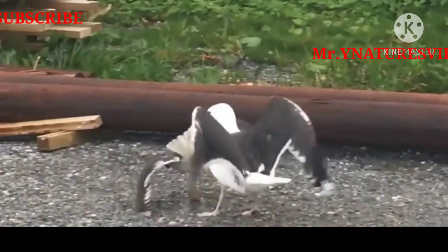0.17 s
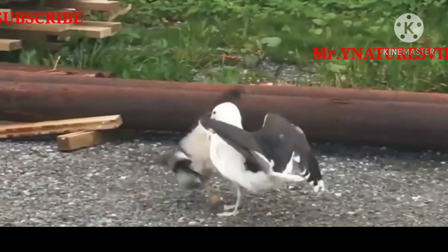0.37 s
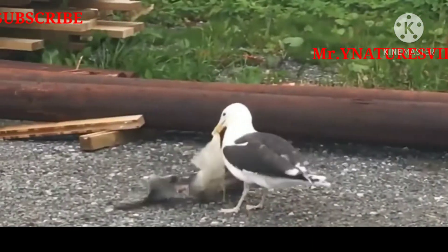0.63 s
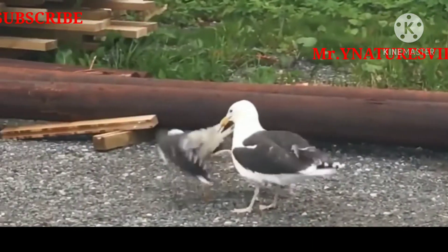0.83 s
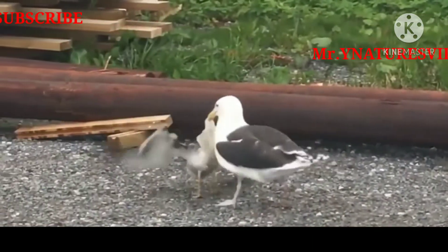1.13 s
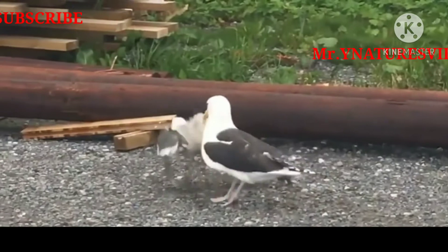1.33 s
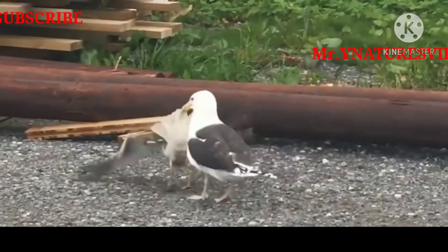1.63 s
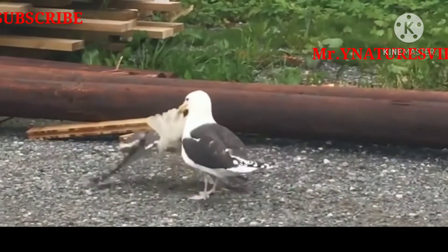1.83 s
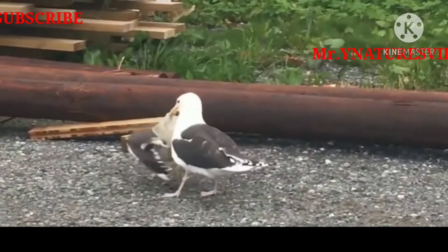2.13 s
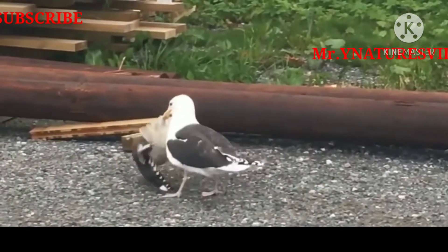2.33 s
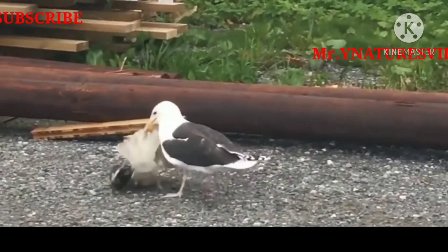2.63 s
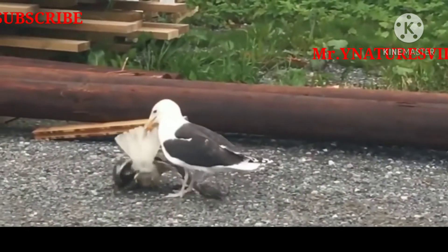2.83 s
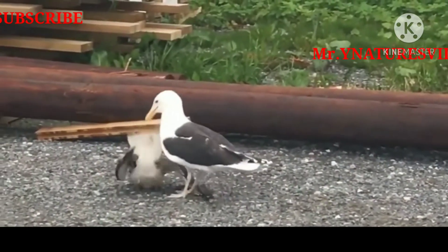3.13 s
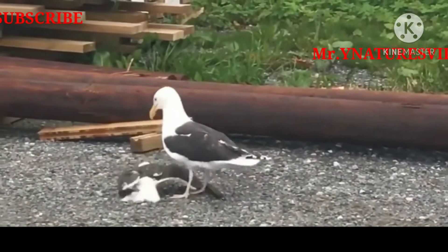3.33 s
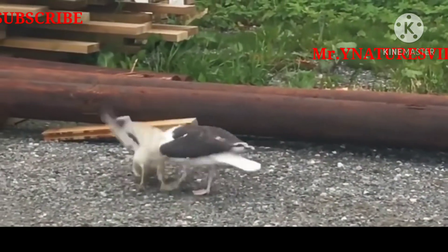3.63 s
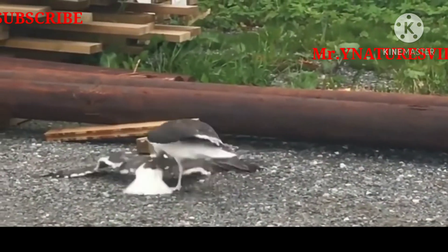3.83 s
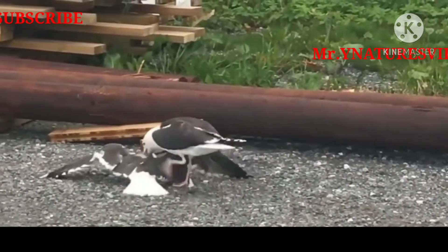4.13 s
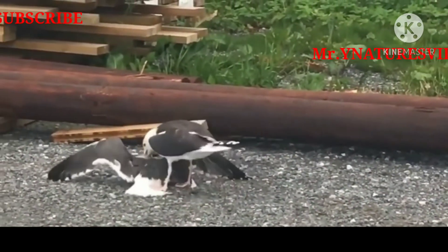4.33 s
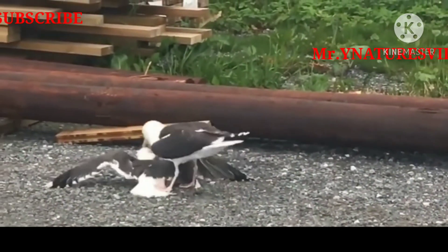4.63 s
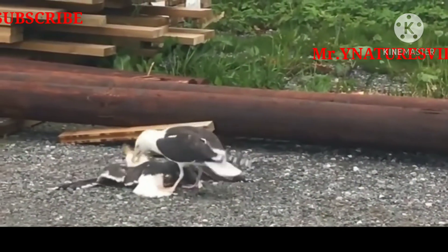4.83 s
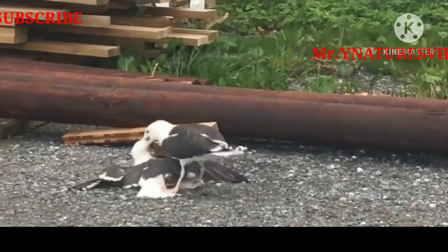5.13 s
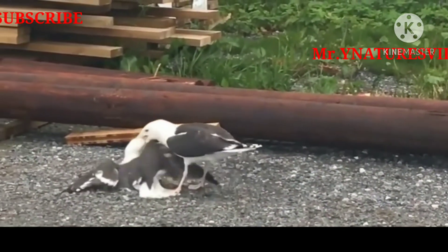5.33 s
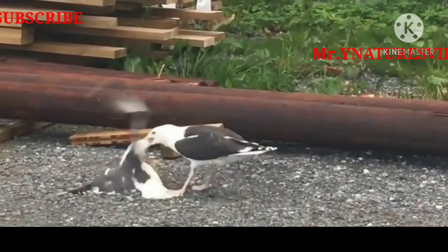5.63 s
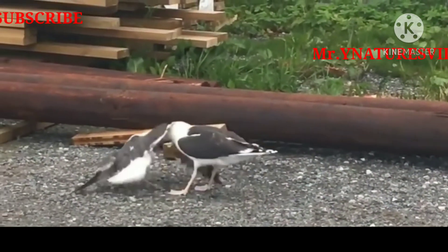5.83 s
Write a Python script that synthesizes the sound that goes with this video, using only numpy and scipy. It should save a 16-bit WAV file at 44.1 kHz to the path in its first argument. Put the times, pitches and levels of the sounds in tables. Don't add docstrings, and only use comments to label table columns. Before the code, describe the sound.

A gripped gull gives harsh, wavering, nasal cries over scuffing gravel and wing flutter, then small clicks and a thin whine, with low wind rumble.

```python
import sys
import numpy as np
from scipy import signal
from scipy.fft import rfft, irfft, next_fast_len
from scipy.io import wavfile
from scipy.ndimage import uniform_filter1d, map_coordinates

SR = 44100
rng = np.random.default_rng(int(sys.argv[2]) if len(sys.argv) > 2 else 0)


def volts_from_decibels(level):
    exponent = np.asarray(level, float) / 20
    return 10 ** exponent


def waveform_to_disk(signal):
    frames = np.transpose(np.atleast_2d(signal))
    scaled = np.clip(frames, -1, 1) * 32767
    samples = np.round(scaled).astype(np.int16)
    wavfile.write(sys.argv[1], SR, samples)


N = 263718
TIME = np.arange(N) / SR
# start in seconds, length in seconds, pitch in Hz, effort in dB.
CHUCKS = [
    (3.782, .014, 218, -51),
    (3.799, 0.027, 236.7, -41.5),
    (3.838, 0.027, 240, -43.5),
    (3.886, .016, 284, -56),
]


def unit(x):
    return x / np.sqrt(np.mean(x ** 2) + 1e-20)


def along(points, hz):
    f, v = np.transpose(points)
    return np.interp(np.log(hz + 1), np.log(f + 1), v)


def curves(rows, t=TIME):
    s, *columns = np.transpose(rows)
    return [np.interp(t, s, column) for column in columns]


def wobble(rate, t=TIME):
    return map_coordinates(rng.standard_normal(N // 100), [(t - t[0]) * rate])


def filtered(x, response):
    m = next_fast_len(len(x) + 8192)
    return irfft(rfft(x, m) * response(np.fft.rfftfreq(m, 1 / SR)), m)[:len(x)]


def resonance(hz, width_hz, order=2):
    return lambda f: (1j * f * width_hz / (hz * hz - f * f + 1j * f * width_hz)) ** order


def noise(spectrum):
    return unit(filtered(rng.standard_normal(N), lambda hz: volts_from_decibels(along(spectrum, hz))))


def outdoors():
    # frequency in Hz, level in dB per Hz.
    rumble = [(13, -35), (22, -10), (38, 3), (55, -0.5), (135, -6), (193, -19.5), (216, -41.5), (320, -23),
              (420, -82), (700, -120)]
    # frequency in Hz, level in dB per Hz.
    air = [(120, -14), (200, -2), (232, -8.5), (558, -16), (898, -21), (966, -2.5), (1060, -19.5),
           (2370, -28), (2690, -31.5), (3420, -15), (4840, -39), (6370, -19), (10600, -34), (14000, -23),
           (15900, -56)]
    # pitch in Hz, width in Hz, level in dB.
    hums = [
        (947, 6.3, -84.5),
        (187.4, 5.5, -76),
        (123.6, 16, -69),
        (48.8, 11.3, -59),
    ]
    # time in seconds, peak level in dB, pitch in Hz.
    buffets = [(.35, -48, 60), (.58, -49, 60), (.675, -42.5, 140), (1.36, -45, 140), (1.825, -39, 84),
               (1.99, -44, 70), (2.06, -48, 70), (2.25, -51, 60), (3.84, -46.5, 65), (5.67, -45.5, 50),
               (5.745, -38.5, 65), (5.81, -48, 50), (5.95, -52, 50)]
    breeze_db, buffet_cycles, air_db = -62.5, 1.2, -75

    wind = volts_from_decibels(breeze_db) * unit(volts_from_decibels(2.85 * wobble(21) + 0.7 * wobble(4)) * noise(rumble))
    for s, db, hz in buffets:
        since = TIME - s
        wind += volts_from_decibels(db) * np.exp(-(since * hz / buffet_cycles) ** 2) * np.sin(2 * np.pi * hz * since)
    machines = np.zeros(N)
    for hz, width_hz, db in hums:
        machines += volts_from_decibels(db) * unit(filtered(rng.standard_normal(N), resonance(hz, width_hz, order=1)))
    return wind + machines + volts_from_decibels(air_db - 3.5 + 0.27 * wobble(3.03)) * noise(air)


def gravel():
    # frequency in Hz, level in dB per Hz.
    stone_colour = [(150, -30), (250, 4), (319, -8.5), (606, -2), (1870, -6), (2740, -14.5), (3320, -12.5),
                    (10400, -21), (13300, -25), (15800, -25.5)]
    # time of the peak in seconds, feather rustle in dB,
    # seconds to rise 10 dB, seconds to fall 10 dB, gravel in dB against the rustle.
    scuffles = [(.085, -72, .025, .06, -6), (.145, -78, .02, .02, -6), (.3, -74.5, .025, .025, -9),
                (.385, -74.5, .025, .02, -10), (.35, -83, .4, 0.1, 0), (.49, -70, .035, 0.04, -11),
                (.6, -77, .06, .05, -2), (.69, -70, 0.04, 0.04, 1.5), (.8, -69, .015, .08, -2.5),
                (.83, -68.5, .04, .06, -2.5), (.905, -68.5, .05, .06, -3), (.96, -71.5, .04, .03, -4),
                (1.03, -77, .1, .1, -8), (1.36, -66, 0.015, 0.05, -2), (1.405, -65.5, .05, .09, -6),
                (1.48, -71, .05, .04, -10), (1.66, -71, .02, .04, -12), (1.75, -76, .15, 0.08, -12),
                (1.82, -73, .02, .03, -10), (1.895, -70, 0.025, 0.04, -6), (1.96, -71, .025, .04, -6),
                (2.03, -67.5, 0.04, 0.03, -16), (2.2, -77, 0.1, .015, -6), (2.71, -82, .5, 0.94, 0.5),
                (2.7, -74, .05, .06, -10), (2.96, -76, .05, .05, -10), (3.68, -76, .05, .05, -6),
                (3.85, -77.5, 0.2, 0.4, -3.5), (3.93, -66.5, .016, 0.03, 1), (4.05, -80.5, 0.01, 0.9, -1.5),
                (5.35, -83, 0.48, 0.5, -2.5), (5.49, -72, .03, .04, -14), (5.54, -69.5, .07, .03, -18),
                (5.95, -82, .8, .3, -3)]
    shuffle_db, shuffle_stone_db = -87, -6

    t = TIME[::32]
    stir_db = np.array([db - 10 * np.maximum((s - t) / rise, (t - s) / fall)
                        for s, db, rise, fall, _ in scuffles])
    crunch_db = stir_db + np.array(scuffles)[:, -1:]
    rustle = np.interp(TIME, t, volts_from_decibels(np.maximum(shuffle_db, stir_db.max(0))))
    crunch = np.interp(TIME, t, volts_from_decibels(np.maximum(shuffle_db + shuffle_stone_db, crunch_db.max(0))))

    sizes = volts_from_decibels(4 * np.minimum(rng.exponential(size=N), 1.5))
    grains = unit(sizes * (rng.random(N) < 0.02) * rng.standard_normal(N))
    grit = grains + 0.6 * rng.standard_normal(N)
    high = lambda hz: 1 / (1 + (4500 / (hz + 1)) ** 4)
    feathers = filtered(grit, lambda hz: volts_from_decibels(along(stone_colour, hz)) * high(hz))
    stones = filtered(grit, lambda hz: volts_from_decibels(along(stone_colour, hz)) * (1 - high(hz)))
    return volts_from_decibels(1.5 + 2.5 * wobble(60)) * (rustle * feathers + crunch * stones) / np.std(feathers)


def cries():
    # time in seconds, pitch in Hz, effort in dB, gape of the beak in dB.
    hoarse = [(0.033, 255.6, -51.5, -21), (0.057, 298.6, -43, -13), (0.095, 289, -55, -5.5),
              (0.165, 325, -54, -10), (0.25, 370, -58, -8), (0.35, 358, -47.5, -9), (0.45, 335, -47, -9),
              (0.49, 353, -47.5, -8), (0.525, 337, -48, -8)]
    sink = [(0.525, 330, -47, -4), (0.54, 303, -50, -5), (0.635, 326.8, -42, -36), (0.665, 285.2, -46, -23),
            (0.698, 236, -46.5, -9)]
    waver = [(1.144, 285, -47.5, -24), (1.168, 278, -43, -19), (1.204, 268, -44.5, -19),
             (1.25, 347, -44.5, -5), (1.29, 372, -42, -2.5), (1.34, 347, -44.5, -8), (1.39, 315, -47, -19),
             (1.44, 351, -44, -30), (1.488, 313, -52, -15)]
    climax = [(1.488, 314, -52.5, -13), (1.57, 340, -48.5, -8), (1.608, 334, -47.5, -5),
              (1.63, 321, -48, -5), (1.655, 332, -44.5, -4), (1.706, 397, -38, -0.5), (1.765, 365, -44, -2),
              (1.796, 362, -43.5, -10), (1.812, 322, -46, -26)]
    choke = [(1.812, 321.4, -41.5, -6), (1.832, 286, -42.5, -6), (1.854, 242, -47, -10),
             (1.87, 217, -58, -19)]
    gasp = [(1.878, 207, -54.5, -9), (1.914, 248.3, -46.5, -9), (1.94, 290.6, -48.5, -8.5),
            (2.002, 283.3, -42, -17.5), (2.04, 246.3, -63, -4)]
    bark = [(2.484, 306, -45, -15), (2.505, 306.5, -43.5, -5), (2.599, 271, -48, -24),
            (2.617, 254, -53, -16.5), (2.703, 268.2, -45.5, -26.5), (2.739, 292.5, -54.5, -5.5)]
    drone = [(2.739, 292, -53.5, -5), (2.773, 264.6, -43, -22.5), (2.843, 279.2, -50, -8),
             (2.915, 286.9, -44.5, -15.5), (3.051, 292.5, -46, -10), (3.16, 289, -45, -10),
             (3.251, 282, -43.5, -10), (3.285, 264, -50.5, -14), (3.303, 285, -44.5, -25)]
    pipe = [(4.1, 549, -61.5, -33), (4.142, 581, -50.5, -34), (4.175, 590, -51, -20), (4.2, 575, -51, -18),
            (4.209, 470, -44, -16)]
    whine = [(4.209, 430, -47.5, -22), (4.235, 413, -51, -12), (4.275, 435, -47, -18),
             (4.316, 417, -48, -15), (4.328, 409, -59.5, -2), (4.398, 399, -56.5, -5),
             (4.42, 429, -48, -17), (4.455, 370, -46.5, -16), (4.495, 320, -62, -17)]
    gape_db, fade_db = -10.5, 5.5
    chucks = [[(s, hz, db, gape_db), (s + length, hz, db - fade_db, gape_db)]
              for s, length, hz, db in CHUCKS]
    return [hoarse, sink, waver, climax, choke, gasp, bark, drone, *chucks, pipe, whine]


def roughness(t):
    # start in seconds, end in seconds, roughness 0-1 at the start, roughness in the middle.
    breaths = [
        (.03, .7, .3, .1),
        (1.14, 2.04, .4, .045),
        (2.48, 3.3, .5, .04),
        (4.1, 4.5, .06, .06),
    ]
    # start in seconds, end in seconds, roughness 0-1, throb of the second membrane 0-1,
    # voice cycles in one throb.
    breaks = [(.06, .145, .2, 0, 3), (.145, .29, .6, .8, 3), (.29, .45, .24, .9, 3), (.45, .53, .13, .2, 3),
              (1.14, 1.24, .16, .1, 3), (1.37, 1.5, .13, .1, 3), (1.815, 1.935, .33, .4, 5.8),
              (3.77, 3.92, .25, .3, 5.8), (4.11, 4.2, .14, .45, 2), (4.21, 4.34, .12, .2, 5.8),
              (4.34, 4.41, .08, .1, 5.8), (4.42, 4.51, .3, .3, 5.8)]
    settle_s, end_rough = 0.022, 0.4

    rough = np.zeros(len(t))
    for a, b, start, middle in breaths:
        onset = (start - middle) * np.exp(-np.abs(t - a) / settle_s)
        ending = end_rough * np.exp(-np.abs(b - t) / settle_s)
        rough += (t > a - 0.02) * (t < b + 0.02) * (middle + onset + ending)
    grip = np.array([np.clip(np.minimum(t - a, b - t) / 0.03 + 0.5, 0, 1) for a, b, *_ in breaks])
    _, _, break_rough, break_throb, break_span = np.transpose(breaks)
    return np.maximum(rough, break_rough @ grip), break_throb @ grip, break_span[grip.argmax(0)]


def pulses(at, size, n):
    k = np.floor(at).astype(int)[:, None] + np.arange(-7, 9)
    offset = k - at[:, None]
    w = size[:, None] * np.sinc(offset) * np.cos(np.pi * offset / 16) ** 2
    return np.bincount(np.clip(k, 0, n - 1).ravel(), w.ravel(), n)


def patchy(x, depth_db):
    z = signal.stft(x, nperseg=512, noverlap=384)[2]
    field = rng.standard_normal((257, 400))
    for width, axis in [(3, 0), (10, 1), (7, 1)]:
        field = uniform_filter1d(field, width, axis)
    swell = volts_from_decibels(depth_db * unit(field))[:, :z.shape[1]]
    return signal.istft(z * swell, nperseg=512, noverlap=384)[1][:len(x)]


def steady(x):
    power = uniform_filter1d(uniform_filter1d(x * x, 900), 900)
    return x / np.sqrt(np.abs(power) + 1e-12)


def cry(rows, chest_db, rasp_db, rasp_opens, chest_hz, pipe_hz, pipe_width, beak_hz, beak_width,
        rasp_hz, rasp_width, whistle_db):
    # time in seconds, jump in cycles.
    catches = [
        (2.736, .12),
        (2.925, 0.35),
        (2.985, .22),
        (3.143, 0.14),
    ]
    # time in seconds, # chest
    # in dB, throat in dB, air sac in dB, whistle in dB.
    grip_swells = [(.035, 0, -7, 0, 0), (.09, 6, 2, 0, 0), (.13, 8, -1, 5, 0), (.18, -1, -1, 6, 0),
                   (.25, 1, -2, 8, 0), (.31, 1, 1, 0, 0), (.38, 4, 3, 0, 0), (.47, -3, -1, 4, -1),
                   (.57, 3, 1, 3, 0),
                   (1.14, -3, -6, 0, 0), (1.18, -6, 2, 3, 3), (1.24, 8, 2, 3, 4), (1.29, -4, 1, -3, 6),
              (1.33, -5, 1, -1, 6), (1.385, 8, 0, 0, 6), (1.465, 7, 4, 2, 1), (1.495, -16, 3, 4, 1),
              (1.53, -8, 3, 2, -2),
                   (1.57, -1, 4, -8, -2), (1.61, -5, 2, -1, -2), (1.64, -3, -5, 2, 4), (1.67, 4, -7, -2, 6),
              (1.71, 0, -4, -1, 0), (1.745, 2, 2, -1, -5), (1.79, 0, -3, -2, 5), (1.88, -3, -4, 0, 3),
              (1.95, 0, 4, 3, 0),
                   (2.03, -2, -3, -2, 2), (2.49, -1, -1, 0, 1), (2.62, 0, 0, 0, 1), (2.78, 5, 0, 1, 0),
              (2.85, 2, 2, 3, -3), (2.92, -4, 0, 1, -1), (3.08, -3, 0, 4, -1), (3.17, 0, 0, 3, 1),
              (3.29, 0, 0, 0, 0),
                   (4.1, 0, 0, 0, 0), (4.18, 6, 0, 0, 0), (4.21, 3, 0, 3, 0), (4.26, -4, 0, 1, 0),
              (4.3, -1, 0, 0, -2), (4.345, 7, -1, 10, -2), (4.4, 5, 1, 8, 0), (4.44, -1, 1, 3, 0),
              (4.49, -1, -7, 5, 0)]
    plain_effort_db, plain_gape_db = -48, -12
    chest_holds, rasp_holds = 0.91, 0.45
    chest_shuts, chest_top_db = 0.18, 1
    glide_s = 0.018

    first = round(rows[0][0] * SR) - 400
    t = TIME[first:round(rows[-1][0] * SR) + 400]
    instants = np.arange(len(t))
    pitch, pipe_db, beak_db = curves(rows, t)
    pitch = uniform_filter1d(pitch, round(glide_s * SR), mode='nearest')
    grips = grip_swells
    chest_grip_db, throat_grip_db, sac_db, whistle_grip_db = curves(grips, t)
    swell, gape = pipe_db - plain_effort_db, beak_db - plain_gape_db
    chest_db = np.minimum(chest_db - chest_holds * swell - chest_shuts * gape, chest_top_db)
    chest_db = chest_db + chest_grip_db
    rasp_db = rasp_db - rasp_holds * swell + rasp_opens * gape + throat_grip_db

    rough, throb, span = roughness(t)
    pitch = pitch * (1 + (0.002 + 0.035 * rough) * wobble(65, t))
    cycles = np.cumsum(pitch) / SR + sum(slip * (t > s) for s, slip in catches)
    count = np.arange(np.ceil(cycles[0]), cycles[-1])
    at = np.interp(count, cycles, instants)
    r, p, beat, span = (np.interp(at, instants, v) for v in (rough, pitch, throb, span))
    chance = rng.standard_normal((500, 2))[:len(at)]
    swing = beat * np.cos(2 * np.pi * np.cumsum(1 / span))
    at = at + SR / p * (0.13 * r * chance[:, 0] + 0.07 * swing)
    size = volts_from_decibels(3 * r * chance[:, 1]) * (1 + 0.3 * swing)
    hiss = rng.standard_normal(len(t)) * (1 + np.cos(2 * np.pi * cycles))
    source = unit(pulses(at, size, len(t))) + 0.55 * rough * hiss
    airy = patchy(source + 0.03 * hiss, depth_db=3.8)

    band = lambda x, *shape: steady(filtered(x, resonance(*shape)))
    voice = band(source + rough * airy, pipe_hz, pipe_width)
    voice -= volts_from_decibels(chest_db) * band(source, chest_hz, 452)
    voice -= volts_from_decibels(beak_db) * band(airy, beak_hz, beak_width, 2.48)
    breathy = airy + 0.05 * hiss
    whistle = band(breathy, 6600, 1500) - volts_from_decibels(-9.5) * band(breathy, 9100, 2400)
    whistle -= volts_from_decibels(-4.5) * band(airy, 4700, 1200)
    rasp = band(airy, rasp_hz, rasp_width, 2.98)
    voice += volts_from_decibels(rasp_db) * (rasp - volts_from_decibels(whistle_db + whistle_grip_db) * whistle)
    sac = volts_from_decibels(sac_db - 7) * np.abs(resonance(400, 150)(pitch))
    clean = (1 - rough) ** 3 * (1 - np.minimum(throb, 0.85))
    voice += sac * clean * np.sin(2 * np.pi * cycles)

    edge = np.clip(np.minimum(t - rows[0][0], rows[-1][0] - t) / 0.004 + 0.5, 0, 1)
    pipe_db = pipe_db + 0.9 * wobble(40, t)
    return first, -volts_from_decibels(pipe_db) * edge * voice


def gull():
    # chest in Hz, windpipe in Hz, its width in Hz,
    # beak in Hz, its width in Hz, rasp in Hz, its width in Hz, whistle in dB.
    mouths = [*[(620, 1070, 340, 1740, 560, 3520, 1150, -22.5)] * 2, *[(729, 1042, 351.5, 1808, 400, 3430, 1080, -20.0)] * 2, (651.5, 1201, 267, 1900, 592, 3500, 1200, -13),
              (623, 1148, 273, 1760, 520, 3458, 1400, -23),
              *[(700, 1124, 290, 1730, 830, 3350, 1600, -10.0)] * 2, *[(740, 1200, 157, 1820, 720, 3400, 830, -2)] * len(range(3)),
              (600, 1102, 440, 2100, 680, 3900, 1400, -4), (564, 1182, 244, 2040, 640, 3470, 900, -5),
              (736, 1240, 330, 2305, 520, 3480, 560, -8)]
    # chest in dB, rasp in dB,
    # rasp gained in dB a dB of gape.
    balances = [(-10, -12, 0.33), (-8.5, -24, .7), (-10, -14, -.15), (-5, -10, .6), (-12.5, -16, .3),
                (-8, -10, -.3), (-6.5, -17.5, 0.78), (-9, -23.5, 0.43), *[(-9, -36, 0.0)] * len(CHUCKS[1:]),
                (-6, -21, .3), (-8, -27, .8), (-6, -18.5, 0.64)]
    out = np.zeros(N)
    for rows, balance, mouth in zip(cries(), balances, mouths):
        first, sound = cry(rows, *balance, *mouth)
        out[first:first + len(sound)] += sound
    return out


def snaps():
    # time in seconds, peak level in dB, thin quill in dB,
    # heavy stone in dB.
    contacts = [(0.0744, -48, -9, -3), (0.151, -50.5, -5, -9), (0.267, -50, -19, -13),
                (0.4515, -51, -17, -12), (0.4966, -50.5, 5.5, -7), (0.5686, -55, -6, -8),
                (0.604, -51, -13, -8), (0.6312, -48.5, -15, 0.5), (0.6584, -50, -13, 3),
                (0.6842, -41, -6, -0.5), (1.3615, -39.5, -28, 2.5), (1.3857, -42.5, -22, -6),
                (1.8924, -47.5, -16, -10), (1.9173, -40.5, -15, -13), (2.0312, -46, -4, -17),
                (2.683, -54, -7, -14), (2.7376, -57, -1, -12), (2.7567, -53, -14, -1),
                (2.798, -54, -18, -4), (2.8946, -57, -16, -2), (2.9445, -54.5, -7.5, -8),
                (0.823, -55, -4, -8), (0.8969, -53, -23, -3.5), (1.0232, -59.5, -27, -4),
            (1.3526, -50, -14, 14), (2.136, -53, -17, -17), (2.1939, -43, -11, -19.5),
            (3.4196, -59.5, -15, -2.5), (3.8701, -57, -18, -10), (3.918, -57, -14.5, 2),
            (3.9296, -33, -29, -9), (4.035, -50, -29, 2), (5.5962, -60.5, -9, -6), (5.7334, -70, -16, 4),
            (5.8515, -70, -12, 4)]
    # time in seconds, peak level in dB.
    quills = [(0.1012, -57), (0.2882, -60), (0.3044, -72), (0.3819, -64), (0.4668, -57), (0.4843, -38),
              (0.794, -58), (0.8704, -60), (0.9124, -58), (1.1109, -62), (1.4057, -52), (1.501, -60),
              (1.6202, -63), (1.6506, -61), (1.704, -59), (1.8148, -58), (1.8786, -60), (1.9529, -59),
              (2.0234, -42), (2.0354, -46), (2.0494, -55), (2.6444, -65), (2.6963, -54), (2.9652, -60),
              (2.9951, -67)]
    quill_db, quill_top_db = -6, -47
    body_db = -7.5
    soft_db = 7

    flicks = [(s, min(db, quill_top_db) - 13, 13 + quill_db, -24) for s, db in quills]
    cracks, t = np.zeros((4, N + 900)), TIME[:900]
    for s, db, thin_db, stone_db in contacts + flicks:
        crack = volts_from_decibels(db - 60 * t / 0.006) * rng.standard_normal((4, 900))
        crack[:, 0] = 3 * volts_from_decibels(db)
        parts_db = np.array([0, thin_db, min(stone_db, soft_db - stone_db), stone_db + body_db])
        cracks[:, round(s * SR):][:, :900] += volts_from_decibels(parts_db)[:, None] * crack
    # pitch in Hz, width in Hz, level in dB.
    bands = [(6500, 2800, 0.5), (13400, 2900, 9.5), (2480, 2600, 8.6), (440, 1170, 19.4)]
    return sum(volts_from_decibels(db) * filtered(c, resonance(hz, w)) for c, (hz, w, db) in zip(cracks, bands))[:N]


def pebbles():
    # time in seconds, pitch in Hz, peak level in dB.
    knocks = [
        (4.921, 1150, -54),
        (5.308, 680, -60),
        (5.734, 640, -53),
        (5.735, 1900, -60),
        (5.851, 330, -52),
        (5.851, 1500, -60),
    ]
    cycles_to_die = 12
    out = np.zeros(N)
    for s, hz, db in knocks:
        since = np.maximum(TIME - s, 0)
        out += volts_from_decibels(db - 60 * since * hz / cycles_to_die) * np.sin(2 * np.pi * hz * since)
    return out


def yard(x):
    # frequency in Hz, seconds to fall 60 dB.
    echo_times = [(300, 0.16), (900, 0.16), (1200, 0.44), (1600, 0.59), (4000, 0.6), (10000, 0.033)]
    hz, t, z = signal.stft(rng.standard_normal(SR // 2), SR, nperseg=256)
    fade = volts_from_decibels(-60 * t / along(echo_times, hz)[:, None])
    tail = signal.istft(z * fade, SR, nperseg=256)[1]
    return signal.fftconvolve(np.pad(x, (500, 0)), tail / np.linalg.norm(tail))[:N]


def scene():
    birds = gull() + snaps() + pebbles()
    return (birds + volts_from_decibels(-20.0) * yard(birds) + gravel() + outdoors())[None]


def band_limit(x):
    return signal.sosfilt(signal.butter(12, 16410, fs=SR, output="sos"), x)


def record(dry):
    # cancelled pitch in Hz, width in Hz, share removed.
    notches = [
        (2760, 300, .58),
        (10400, 900, .5),
    ]
    fade_in_s = 0.01

    def microphone(f):
        cancelled = sum(min(share, 0.95) * resonance(hz, w, order=1)(f) for hz, w, share in notches)
        bass_cut = (1j * f / (38 + 1j * f)) ** 3
        return (1 - cancelled) * bass_cut * (f < 15800)

    mix = filtered(dry[0] * np.minimum(TIME / fade_in_s, 1), microphone)[None]
    return band_limit(mix)


dry = scene()
out = record(dry)
waveform_to_disk(out)
```